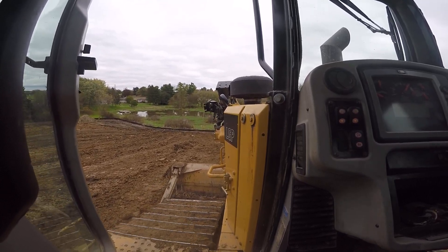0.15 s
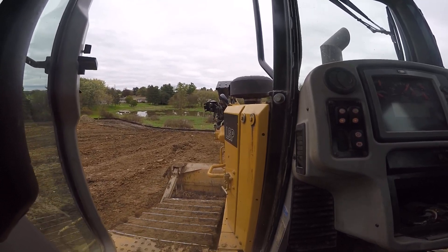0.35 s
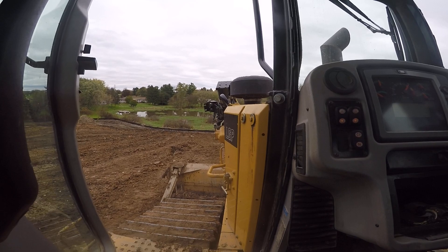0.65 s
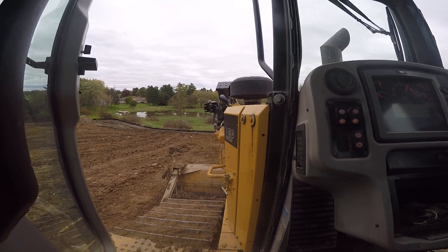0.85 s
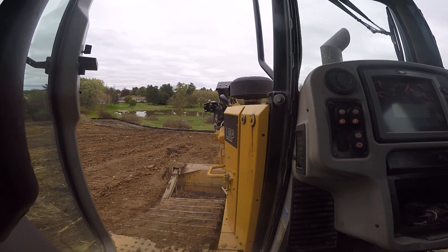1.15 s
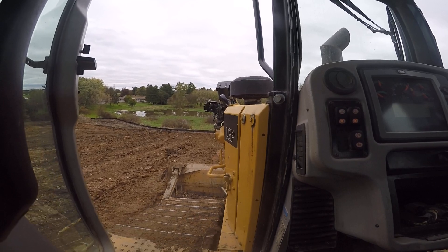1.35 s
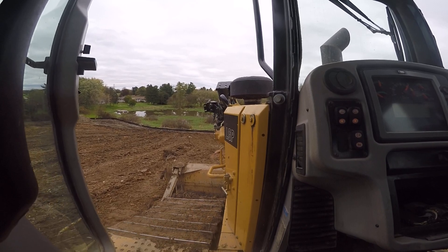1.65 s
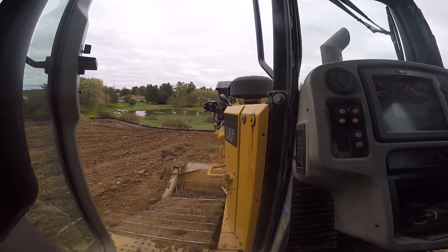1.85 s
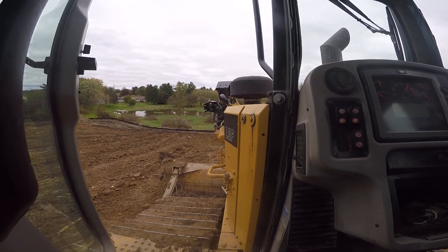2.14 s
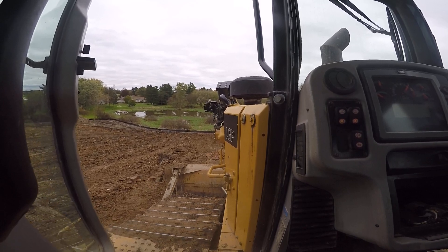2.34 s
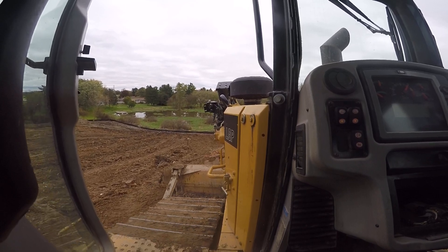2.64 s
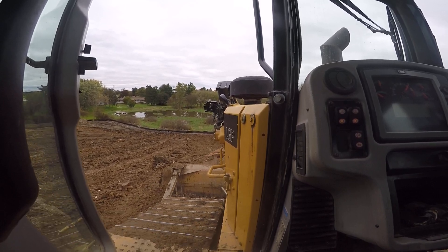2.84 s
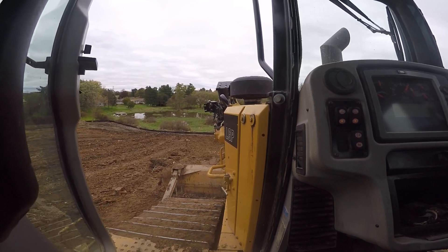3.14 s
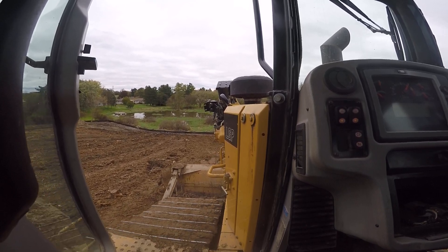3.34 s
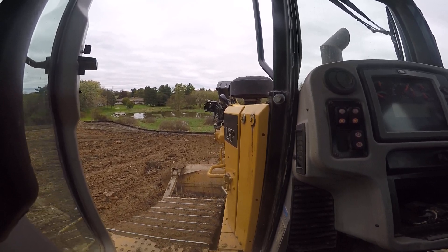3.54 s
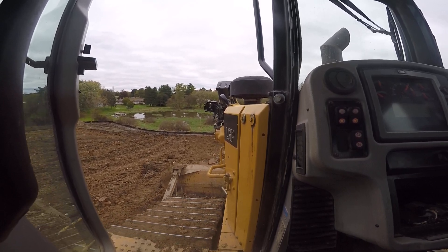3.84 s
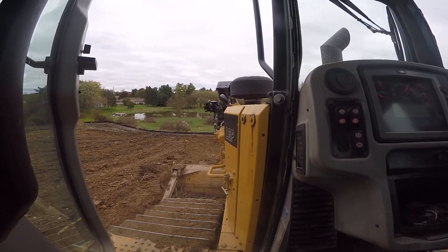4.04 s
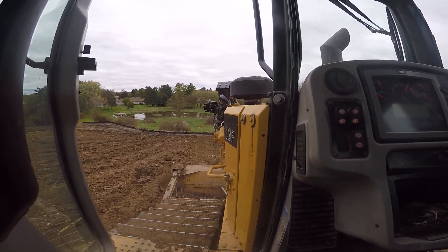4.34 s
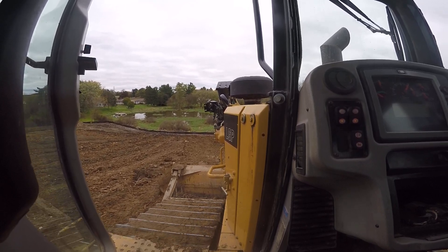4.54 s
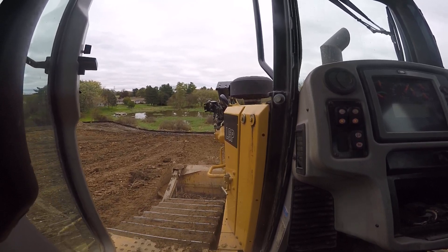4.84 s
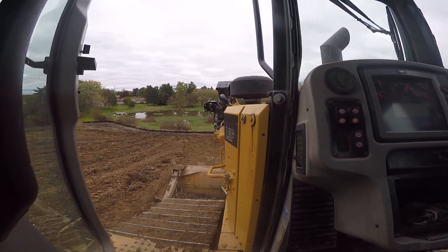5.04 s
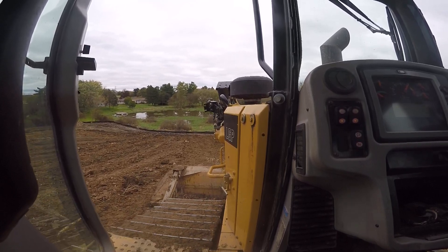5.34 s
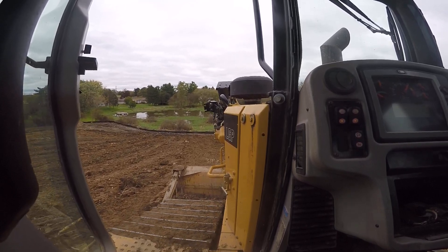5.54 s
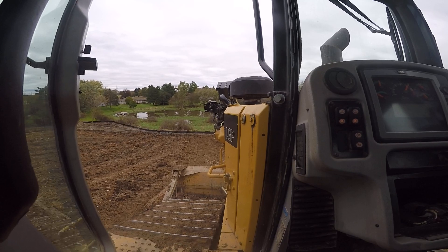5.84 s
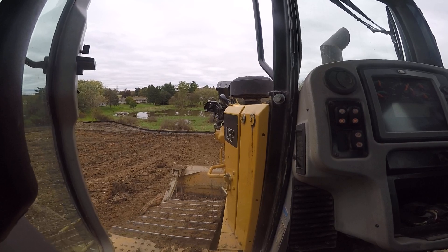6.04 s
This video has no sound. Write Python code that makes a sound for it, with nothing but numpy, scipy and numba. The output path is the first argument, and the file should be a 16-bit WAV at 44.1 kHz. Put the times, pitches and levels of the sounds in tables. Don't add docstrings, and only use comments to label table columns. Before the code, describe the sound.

Loud, steady bulldozer engine drone shakes the cab, with rapid metallic track knocks that soften as the blade loads, plus rushing air and faint high whine.

```python
import sys
import numpy as np
from scipy import signal
from scipy.fft import rfft, irfft, next_fast_len
from scipy.io import wavfile
from scipy.ndimage import uniform_filter1d
from numba import njit

SR = 44100
rng = np.random.default_rng(int(sys.argv[2]) if len(sys.argv) > 2 else 0)


def level_to_linear(level):
    exponent = np.asarray(level, float) / 20
    return 10 ** exponent


def dump(signal):
    limited = np.clip(np.atleast_2d(signal).T, -1, 1)
    pcm = np.round(limited * 32767).astype(np.int16)
    wavfile.write(sys.argv[1], SR, pcm)


N = 272538

# time_s, firing_hz, blade_load [0-1]
CRANK = [
    (0, 100.8, 0),
    (1, 101, .05),
    (1.45, 100.1, .45),
    (2.4, 100.4, .42),
    (3.8, 100.8, .45),
    (4.3, 100.7, .55),
    (4.75, 99.9, .88),
    (5.2, 99.9, .95),
    (6.18, 100.3, 1),
]
CYLINDERS = 6


def level(x, db):
    return x * level_to_linear(db) / np.sqrt(np.mean(x ** 2))


def curves(table):
    time_s, *columns = np.transpose(table)
    return [np.interp(np.arange(N) / SR, time_s, column) for column in columns]


def band(x, hz, width_hz):
    return signal.lfilter(*signal.iirpeak(hz, hz / width_hz, SR), x)


def steep(x, hz, width_hz):
    return band(band(x, hz, width_hz), hz, 2.56 * width_hz)


def walk(rate_hz):
    hold = int(SR / rate_hz)
    steps = np.repeat(rng.standard_normal(N // hold + 1), hold)
    slewed = uniform_filter1d(uniform_filter1d(steps, hold), hold)
    return level(slewed[:N], 0)


def tone(hz, wobble, rate_hz):
    turns = np.cumsum(hz) / SR + .45 * rng.random()
    size = 1 + wobble * walk(rate_hz)
    return np.sqrt(2) * size * np.cos(2 * np.pi * turns + wobble * walk(rate_hz))


def grit():
    # start_s, peak_db
    ticks = [(0.7362, -50), (1.0964, -38), (1.4042, -39), (1.6651, -42), (2.9372, -41), (3.3568, -34),
             (4.115, -44), (4.1714, -39), (5.1562, -45)]
    impulses = np.zeros(N)
    for start_s, peak_db in ticks:
        impulses[int(start_s * SR)] += level_to_linear(peak_db)
    t = np.arange(SR // 200) / SR
    ring = np.sin(2 * np.pi * 13200 * t) + level_to_linear(4) * np.sin(2 * np.pi * 7000 * t)
    tick = np.exp(-t / .0004) * ring
    return level_to_linear(8.0) * signal.fftconvolve(impulses, tick)[:N]


def whistle():
    # time_s, blade_tone_hz
    turbo = [(0, 9795), (.3, 9768), (.75, 9700), (1.05, 9646), (1.3, 9626), (1.5, 9641), (1.85, 9691),
             (2.26, 9669), (2.75, 9711), (3.1, 9713), (3.7, 9682), (4.0, 9624), (4.3, 9545), (4.55, 9529),
             (5.0, 9585), (5.45, 9750), (5.75, 9806), (6.18, 9895)]
    # pitch_hz, width_hz, rms_db on resonance
    duct = [
        (9757, 59, -40.5),
        (9605, 99, -44),
        (9800, 120, -59),
    ]
    hz, = curves(turbo)
    power = sum(level_to_linear(2 * db) / (1 + (2 * (hz - f) / width_hz) ** 2) ** 2 for f, width_hz, db in duct)
    return hz, 10 * np.log10(power)


def turbocharger():
    # pitch_hz, width_hz, rms_db
    hiss_bands = [
        (9660, 240, -52),
        (12700, 1200, -60),
        (14200, 1800, -65),
    ]
    hz, db = whistle()
    hiss = sum(level(steep(rng.standard_normal(N), f, width_hz), hiss_db) for f, width_hz, hiss_db in hiss_bands)
    return level_to_linear(db) * tone(hz, wobble=0.13, rate_hz=25) + hiss


def final_drive():
    # time_s, pitch_hz, rms_db
    gear = [(0, 2284, -43), (2.2, 2282, -42), (4.2, 2270, -43), (5.1, 2252, -40), (5.4, 2260, -45),
            (6.18, 2275, -45)]
    hz, db = curves(gear)
    return level_to_linear(db) * tone(hz + 6 * walk(15), wobble=0.71, rate_hz=60)


def cab():
    # pitch_hz, width_hz, rms_db
    resonances = [(9, 8.6, -44), (20, 5.6, -25), (35.8, 8.8, -25), (49.8, 13.8, -20), (62.2, 15.5, -22.5),
                  (114.5, 36, -20.5), (172.8, 26.3, -23.5), (211.8, 20.8, -22.5), (279.8, 35.6, -28),
                  (318.7, 37, -32.5), (351, 16, -36), (446.3, 90, -27), (545, 47, -30), (628, 73, -26),
                  (723, 115, -26.5)]
    load = curves(CRANK)[1]
    rumble, boom, roar = (level_to_linear(db * (load - load.mean())) for db in (-2.5, 2.5, -1.4))
    out = 0
    for hz, width_hz, db in resonances:
        shaken = level(steep(rng.standard_normal(N), hz, width_hz), 0)
        if hz < 85:
            shaken = band(np.tanh(2.8 * shaken), hz, 2 * width_hz)
        out = out + level(shaken, db) * (rumble if hz < 85 else boom if hz < 240 else roar)
    return out


def block():
    # pitch_hz, width_hz, rms_db
    modes = [(1053, 73, -34.5), (1294, 140, -32.5), (1752, 77, -38), (2690, 270, -41), (5530, 440, -50.5),
             (6500, 1200, -63)]
    # pitch_hz, density_db per Hz
    rush = [(500, -20), (850, -3.5), (938, -9.5), (1040, -0.5), (1310, 0), (1610, -4.5), (1780, -4),
            (2090, -7.5), (2280, -9), (3290, -17.5), (4550, -17), (5330, -20), (6500, -23), (7610, -32.5),
            (9000, -32.5), (11700, -65), (19800, -120)]
    firings = np.cumsum(curves(CRANK)[0]) / SR
    k = firings.astype(int)
    count = k[-1] + 1
    scatter_db = 4.4 * np.clip(rng.standard_normal(count), -2, 2)
    cylinder_db = 1.3 * rng.standard_normal(CYLINDERS)[np.arange(count) % CYLINDERS]
    burst = level_to_linear(scatter_db + cylinder_db)[k] * np.exp(-(firings % 1) / 0.73)
    tick_db = 4.6 * rng.exponential(size=N) * (rng.random(N) < .05)
    grain = rng.standard_normal(N) * level_to_linear(tick_db)
    clatter = sum(level(steep((1.6 + burst) * grain, hz, width_hz), db) for hz, width_hz, db in modes)
    rush_hz, rush_db = np.transpose(rush)
    bin_hz = np.arange(1, N // 2 + 2) * SR / N
    colour = level_to_linear(np.interp(np.log(bin_hz), np.log(rush_hz), rush_db))
    air = rng.standard_normal(N) * (1 + 0.12 * burst) * level_to_linear(0.26 * walk(20))
    return clatter + level(irfft(rfft(air) * colour, N), -23.0)


def drone():
    firing_tones = [
        (1, -20, 0),
        (2, -36, 19.5),
        (3 / 2, -22.5, -1),
        (1 / 2, -22, -1),
    ]
    cycle_tones = [(2, -28), (5, -39), (7, -24), (8, -35), (10, -28), (13, -33), (15, -35), (16, -40),
                   (17, -40), (21, -47), (22, -47), (23, -48), (24, -45), (25, -43), (26, -44), (27, -41),
                   (28, -40), (29, -43), (30, -41)]
    hz, load = curves(CRANK)
    firing = sum(level_to_linear(db + load * load_db) * tone(k * hz, wobble=0.12, rate_hz=5)
                 for k, db, load_db in firing_tones)
    cycle = sum(level_to_linear(db) * tone(k * hz / CYLINDERS, wobble=0.13, rate_hz=3.04) for k, db in cycle_tones)
    return level_to_linear(1.5) * (firing + cycle)


def blow(modes, detune):
    t = np.arange(SR // 4) / SR
    out = 0
    for (hz, db, t60_s), d in zip(modes, detune):
        swell = 1 - np.exp(-(t * hz / 1.2) ** 2)
        decay = np.exp(-np.log(1000) * t / t60_s)
        out = out + level_to_linear(db) * swell * decay * np.cos(2 * np.pi * hz * d * (t - .003))
    return out


def tracks():
    # start_s, ring_peak_db
    links = [(0.056, -7.5), (0.268, -8.5), (0.478, -7.5), (0.691, -1), (0.887, -4), (1.105, -4.5),
             (1.308, -8.5), (1.523, -5.5), (1.738, -9), (1.942, -2.5), (2.369, -10), (2.581, -9),
             (2.795, -7.5), (3.006, -6), (3.215, -5), (3.428, -10), (3.638, -7.5), (3.85, -7.5),
             (4.063, -12.5), (4.271, -8), (4.49, -13.5), (4.706, -12), (4.933, -11), (5.38, -10.5),
             (5.612, -16), (5.826, -11), (6.04, -14)]
    # start_s, ring_peak_db
    slaps = [(0.394, -16), (1.584, -12), (2.257, -20), (2.88, -15), (3.979, -10.5), (5.52, -15.5)]
    # pitch_hz, level_db, t60_s
    ring = [
        (613, -5, .15),
        (690, -8, .1),
        (650, -9, .025),
    ]
    # pitch_hz, level_db, t60_s
    thud = [(108, -7, .15), (172, -6, .15), (285, -10, .15), (330, -9, .15), (441, -10, .1)]
    out = np.zeros(N + SR)
    for blows, thud_db in ((links, -4), (slaps, -11.5)):
        chance = rng.standard_normal((len(blows), len(ring) + len(thud) + 1))
        for (start_s, ring_db), c in zip(blows, chance):
            detune = 1 + .025 * c
            bright = level_to_linear(ring_db + 4.0) * blow(ring, detune)
            dull = level_to_linear(thud_db + c[-1]) * blow(thud, detune[len(ring):])
            start = int(start_s * SR)
            out[start:start + len(bright)] += bright + dull
    return out[:N]


def scene():
    return (grit() + turbocharger() + final_drive() + cab() + block() + drone() + tracks())[None]


@njit
def follow(x, rise, fall):
    y, e = np.empty(len(x)), 0.
    for i in range(len(x)):
        e += (x[i] - e) * (rise if x[i] > e else fall)
        y[i] = e
    return y


def gain_control(x):
    heard = np.abs(signal.sosfilt(signal.butter(2, 300, "high", fs=SR, output="sos"), x))
    peak = follow(heard, 1 / (0.002 * SR), 1 / (0.049 * SR))
    gain = np.minimum(1, level_to_linear(-12.5) / (peak + 1e-9)) ** 0.76
    ahead = np.minimum(np.arange(N) + int(0.00073 * SR), N - 1)
    return x * uniform_filter1d(gain[ahead], size=128)


def resampling_image(x):
    mirror_hz = 24000
    high = signal.hilbert(steep(x, 9700, 500), next_fast_len(N))[:N]
    return level_to_linear(-21) * np.real(np.conj(high) * np.exp(2j * np.pi * mirror_hz * np.arange(N) / SR))


def patches():
    # low_hz, high_hz, kept_db, masking_whistle_db
    slices = [
        (10300, 10650, -69, -49),
        (10650, 11050, -69, -58),
        (11050, 11400, -68, -59),
        (11400, 11750, -67, -52),
    ]
    whistle_db = whistle()[1] + 5 * walk(9) - 1
    out = 0
    for low_hz, high_hz, db, mask_db in slices:
        chance = np.repeat(rng.standard_normal(N // 1024 + 1), 1024)[:N]
        kept = whistle_db + 5 * chance < mask_db
        slice_filter = signal.ellip(5, .5, 60, [low_hz, high_hz], "band", fs=SR, output="sos")
        hiss = signal.sosfilt(slice_filter, kept * rng.standard_normal(N))
        out = out + level_to_linear(db) * hiss * np.sqrt(SR / 2 / (high_hz - low_hz))
    return out


def top_cut(x):
    return signal.sosfilt(signal.butter(12, 15190, fs=SR, output="sos"), x)


def record(dry):
    x = gain_control(dry[0])
    x = x + resampling_image(x)
    x = x / (1 + np.abs(x / .96) ** 7) ** (1 / 7)
    dead_band = signal.ellip(5, .5, 60, [10300, 11800], "bandstop", fs=SR, output="sos")
    x = signal.sosfilt(dead_band, x) + patches()
    return top_cut(x[None])


dry = scene()
out = record(dry)
dump(out)
```